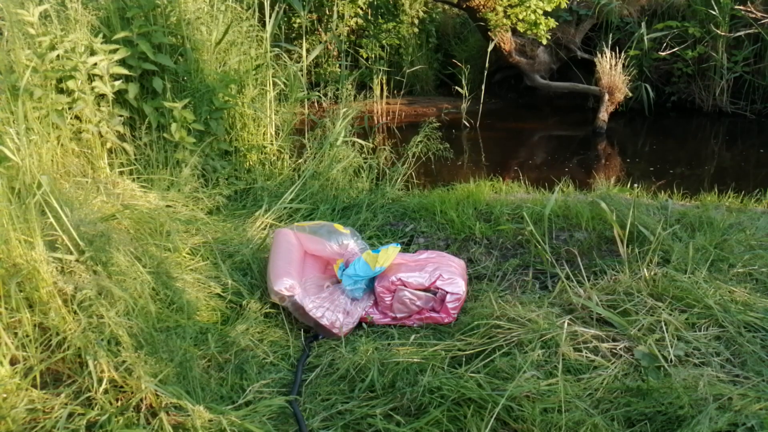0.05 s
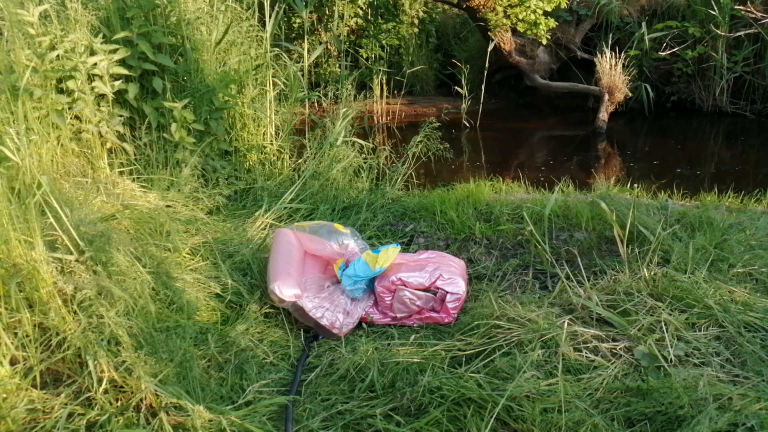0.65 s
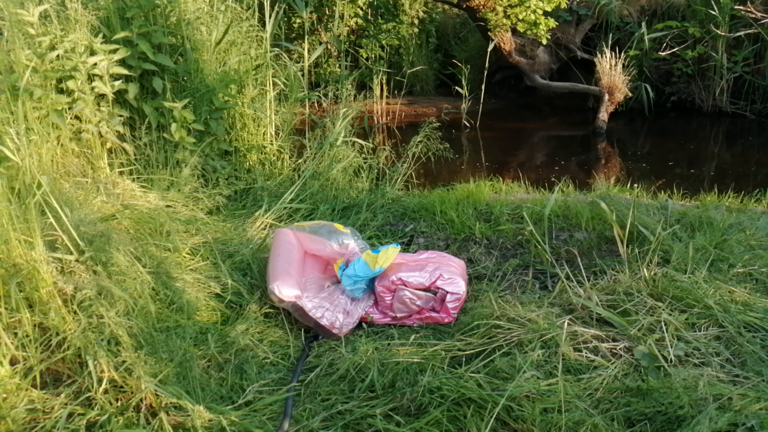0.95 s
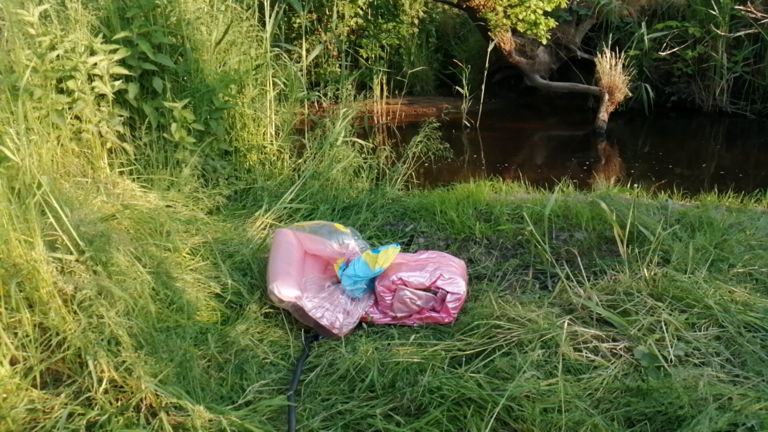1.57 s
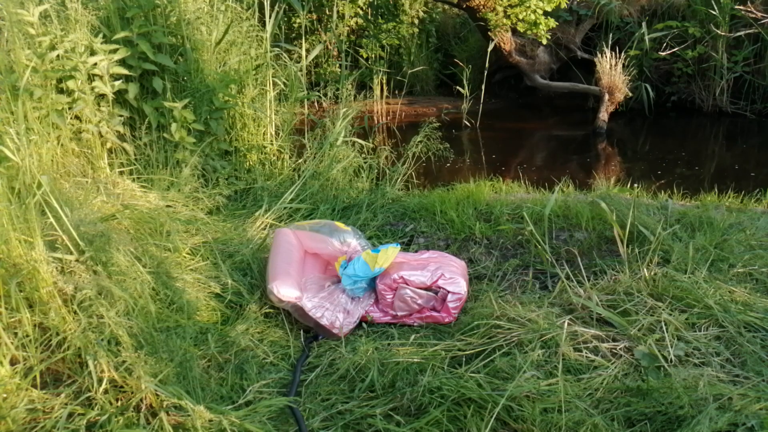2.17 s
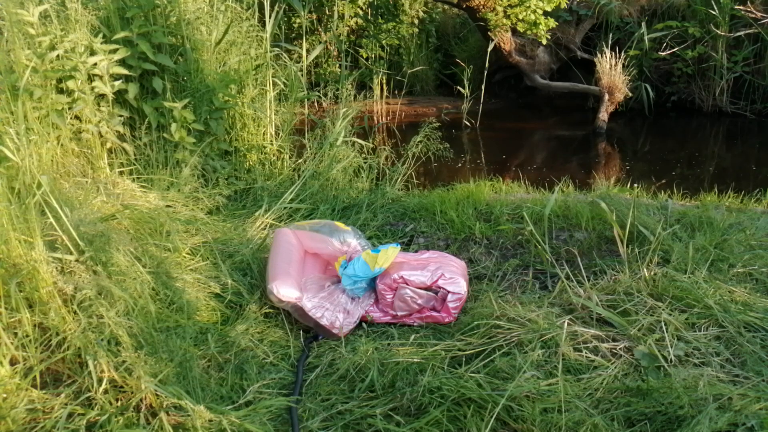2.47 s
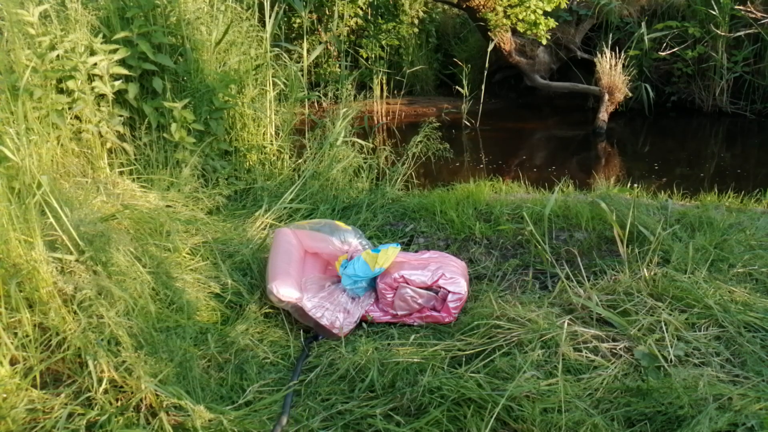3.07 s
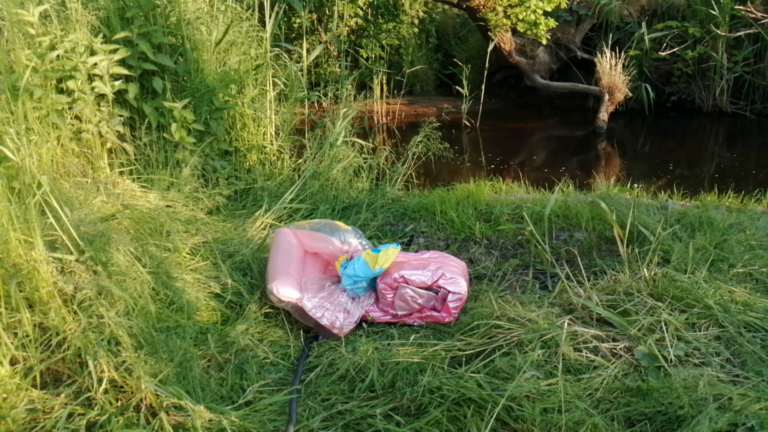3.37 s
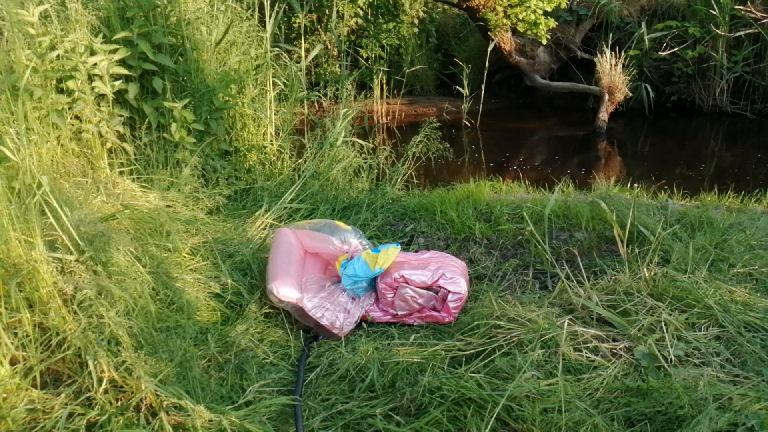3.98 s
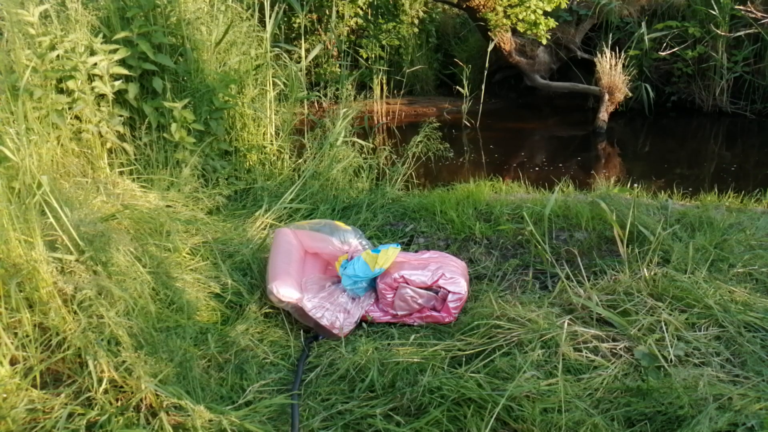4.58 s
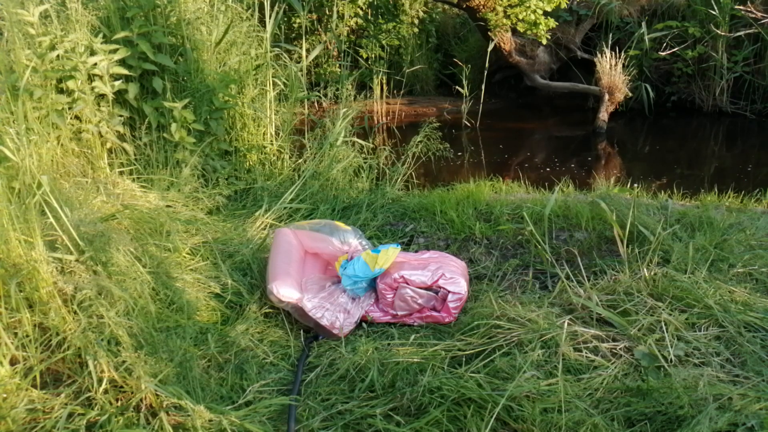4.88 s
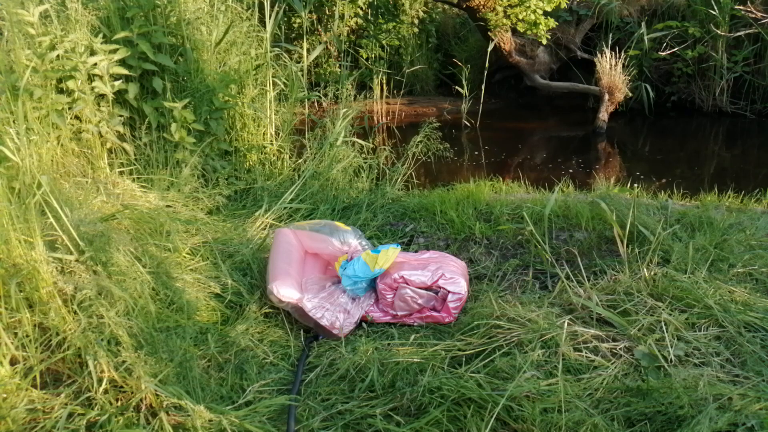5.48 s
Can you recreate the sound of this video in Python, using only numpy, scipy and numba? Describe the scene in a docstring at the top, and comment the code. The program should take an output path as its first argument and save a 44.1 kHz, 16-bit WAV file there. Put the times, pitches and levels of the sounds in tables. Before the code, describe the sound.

A hand pump inflates a plastic toy outdoors in swelling strokes of hissing air, with hollow knocks, small ticks and two short creaks.

```python
"""Hand pump on the grass

A double-action hand pump fills a plastic toy by a slow stream, close by and a little to the left.
Each stroke is one swell of air: a rush through the valves that peaks early, and a nozzle hiss that
follows the pressure. The piston judders twice as it starts down and knocks at the bottom, while shaft
and hose tick and bump. After the last knock only a brief hum and faint outdoor noise are left."""
import sys
import numpy as np
from scipy import signal
from scipy.fft import rfft, irfft
from scipy.io import wavfile
from scipy.ndimage import uniform_filter1d, map_coordinates
from numba import njit

SR = 44100
rng = np.random.default_rng(int(sys.argv[2]) if len(sys.argv) > 2 else 0)


def generate_wav(signal):
    """Clip the signal to [-1, 1] and save it as 16-bit WAV at the path in sys.argv[1]."""
    frames = np.transpose(np.atleast_2d(signal))
    scaled = np.clip(frames, -1, 1) * 32767
    pcm = np.round(scaled).astype(np.int16)
    wavfile.write(sys.argv[1], SR, pcm)


N = 253134
T = np.arange(N) / SR
FREQS = np.fft.rfftfreq(N, 1 / SR) + 1e-3

# Levels in the tables are relative; t60 is the time a sound takes to fade by 60 dB.
# tone of the background rumble and hiss, with the microphone's peaks near 7 and 15 kHz: f/Hz, level/dB
BACKGROUND_TONE = [(20, 4), (60, 13.5), (80, 7.5), (110, -2.5), (350, -7.5), (560, -7), (950, -5.5),
                   (1600, -10.5), (3300, -7.5), (3800, -15), (5200, -4), (7350, 2.5), (8300, -5),
                   (11000, -6.5), (13500, -6.5), (14900, 2.5), (15700, -4.5)]
# how much the background differs between left and right: f/Hz, level/dB
BACKGROUND_WIDTH = [(60, -9), (400, -3), (1500, -1.0), (5000, -0.5)]
# tone of the rustling grass: f/Hz, level/dB
RUSTLE_TONE = [(100, -18.5), (200, -3.5), (350, -1), (600, -16), (950, -11), (2000, -22), (5000, -14.5),
               (9000, -42.5)]
# clearest ticks of shaft and hose: t/s, level/dB, hardness (0 to 1)
TICK_EVENTS = [(0.017, -35, 0.47), (.07, -35.5, 0.3), (0.086, -35, 0.71), (0.143, -36, 0.3),
               (0.215, -39.5, 0), (0.253, -36, 0.74), (0.4, -40, 0.6), (0.416, -41.5, 0), (.806, -44, 1),
               (.97, -39.5, 0.91), (1.141, -39, 0.7), (1.696, -39, 0.93), (1.827, -29.5, 0.82),
               (1.875, -36.5, 0.8), (2.011, -33, 0.77), (2.149, -28, 0.72), (2.427, -31.5, 0.54),
               (2.763, -33.5, 1), (2.981, -34, 0.9), (3.913, -39, .45), (3.995, -48.5, 0.64)]
# resonances of a tick: f/Hz, width/Hz, level/dB
TICK_RESONANCES = [(390, 53, -3.5), (700, 110, -3), (1090, 140, -5), (1356, 1200, -13.5)]
# ringing of a tick's bump, the pump body, its base and its barrel: f/Hz, level/dB, t60/s, signed gain
BUMP_RING = [(156.6, 1.6, 0.052, 0.35), (244, 3.7, 0.032, -0.43)]
BODY_RING = [(100, -16.5, .056, 0.47), (263, -18, 0.036, 1), (356.4, 2, .019, 0.93),
             (378, 2.5, 0.021, -0.89), (437, -13, 0.042, 0.67), (657, -23, 0.049, -0.89),
             (877, -20.5, 0.077, 0.69), (1040, -20.5, 0.017, -0.84), (1252, -19.5, .04, -0.91),
             (1527, -8.5, 0.014, 0.45), (2020, -20, 0.032, -1.6), (3200, -32, 0.021, 0.69),
             (3490, -36.5, .025, 0.53), (4740, -32, 0.034, 0.3)]
BASE_RING = [(138, 0, 0.1, 0.11), (264, 0.5, 0.037, 0.91), (420, -6, 0.074, -0.21),
             (646, -17.5, 0.052, -1.16)]
BARREL_OVERTONES = [(564, -9.5, .11, 1), (962, -13, 0.095, -1.08), (1355, -15, 0.034, 1),
                    (1700, -32, 0.14, -1.4)]
# piston judders, one table each: t/s, slip rate/Hz, level/dB
JUDDER_CURVES = [
    [(1.3946, 39, -8.5), (1.412, 109.6, 1.5), (1.437, 106, 6), (1.446, 133, 0.5), (1.455, 200, 0.5)],
    [(3.2246, 47.5, -10.5), (3.248, 81.7, -1), (3.278, 113.6, 1.5), (3.314, 112, 6.5), (3.331, 69, -0.5),
     (3.347, 103, -1.5)],
]
# piston hits the bottom: t/s, level/dB, boost of the first overtone/dB, t60 of the barrel's lowest note/s
KNOCK_EVENTS = [(0.3423, -23, 5.5, 0.22), (2.393, -21, 5.5, 0.13), (4.0501, -21, -10.5, 0.29)]
# strokes, down and up in turn: start/s, end/s, rush level/dB, nozzle level/dB,
# nozzle swell from ends to middle/dB, flap whistle over the rush at the start/dB
PUMP_STROKES = [(-.6, 0.36, -47.5, -46.5, 20.5, 19), (0.408, 1.43, -50, -47, 16, 5.5),
                (1.477, 2.41, -41, -37.5, 25.5, -6), (2.464, 3.217, -44.5, -37.5, 21.5, 6),
                (3.6, 3.965, -53.5, -51.5, 4.5, -15)]
# resonances of the air path going up and going down: f/Hz, width/Hz, level/dB
PULL_RESONANCES = [(384, 110, 0), (680, 76, -18.5), (1136, 76, -1), (1530, 170, 0), (1854, 120, 1),
                   (2170, 120, -5), (2510, 100, 2), (2917, 220, 1), (3270, 180, 0.5), (3594, 110, 3.5),
                   (4820, 710, 0)]
PUSH_RESONANCES = [(371, 110, -2.5), (933, 93, -0.5), (1310, 360, -2), (1726, 170, 2), (2064, 82, 4),
                   (3156, 100, 4), (3490, 120, -0.5), (4040, 59, 1), (4776, 350, 1), (5093, 200, 3.5)]
# tone of the swirling air in the pump: f/Hz, level/dB
RUSH_TONE = [(80, -35.5), (250, -20.5), (600, -12.5), (1500, -12), (2600, -4), (3800, -12), (5000, -4.5),
             (8000, -30)]
# tone of the nozzle hiss, with the microphone's peaks near 7 and 15 kHz: f/Hz, level/dB
HISS_TONE = [(1000, -31), (3800, -11), (4900, -5), (5600, -4.5), (6600, 3), (7350, 2.5), (8200, -6.5),
             (9500, -7.5), (11000, -8.5), (13500, -6), (14800, 0), (15700, -5.5)]
# the pump at the two microphones: f/Hz, left minus right/dB, left lead/rad, direct share (0 to 1)
STEREO_IMAGE = [(100, 3.5, 0.5, 1), (380, 3, 0.29, 1), (750, 2, 0.86, 1), (1300, -1, 1, 0.89),
                (1850, 1.5, 2.7, 0.41), (3280, 3.5, 3.88, 0.48), (5230, -4.5, 4.97, 0.73),
                (6000, -3, 7.56, 0.16), (7900, 9, 8.6, 0.29), (10800, 2.5, 8, .4), (15000, -2, 18, .3)]


def undb(db):
    """Turn decibels into a gain."""
    return 10 ** (np.asarray(db) / 20)


def unit(x):
    """Scale to an average (rms) level of 1."""
    return x / np.sqrt(np.mean(x ** 2))


def noise(rows=1):
    """White noise. Three rows stand for direct, scattered left and scattered right sound."""
    return rng.standard_normal((rows, N))


def shape(x, response):
    """Filter a sound with one gain for each frequency."""
    return irfft(rfft(x) * response, N)


def curve(table, column=1):
    """Join the points of a table into a curve over all frequencies."""
    table = np.array(table)
    return np.interp(np.log(FREQS), np.log(table[:, 0]), table[:, column])


def band(hz, width_hz):
    """One resonance, with gain 1 at its centre."""
    return 1 / (1 + 1j * (FREQS / hz - hz / FREQS) * hz / width_hz)


def wander(rate_hz):
    """A smooth random wobble, about 1 in size."""
    hold = int(SR / rate_hz)
    steps = np.repeat(rng.standard_normal(N // hold + 1), hold)
    return 1.3 * uniform_filter1d(uniform_filter1d(steps, hold), hold)[:N]


def fade(t60):
    """A fade from 1 towards 0, half a second long."""
    return np.exp(-np.log(1000) * T[:SR // 2] / t60)


def ring(modes):
    """Fading tones after one blow."""
    t = T[:SR // 2]
    return -sum(gain * undb(db) * fade(t60) * np.sin(2 * np.pi * hz * t) for hz, db, t60, gain in modes)


def add(out, start_s, sound):
    """Mix a sound in at the given time."""
    i = max(int(start_s * SR), 0)
    out[i:i + len(sound)] += sound[:N - i]


def cut_bass(x, hz):
    """A small body cannot give off deep bass."""
    ratio = hz / (1j * FREQS)
    return shape(x, 1 / (1 + 0.92 * ratio + ratio ** 2))


def outdoors(level_db=-57):
    """Faint background: a low rumble shared by both sides and a thin, wide hiss."""
    tone = undb(curve(BACKGROUND_TONE))
    mid = shape(noise(), tone)
    side = shape(noise(), tone * undb(curve(BACKGROUND_WIDTH)))
    stereo = np.vstack([mid + side, mid - side]) / np.std(mid)
    return stereo * undb(level_db + 0.44 * wander(6.1))


def hum():
    """A faint low hum wavers for about a second after the last knock."""
    swell = np.interp(T, [4.05, 4.3, 5.2, 5.45], [0, 1, 1, 0])
    pitch_hz = 68 + 1.62 * wander(6.05)
    return undb(-67) * swell * np.sin(2 * np.pi * np.cumsum(pitch_hz) / SR)


def rustle(taps_per_s=45):
    """Grass and plastic settle in faint, scattered taps."""
    taps = (rng.random(N) < taps_per_s / SR) * rng.random(N) ** 2
    bursts = noise()[0] * signal.fftconvolve(taps, fade(0.04))[:N]
    return undb(-70.5) * unit(shape(bursts, undb(curve(RUSTLE_TONE))))


def crinkles(per_s=12):
    """Extra rows for the tick table: random small ticks, as strong as the air that moves the hose."""
    flow = rush_level(PUMP_STROKES)
    moments = np.flatnonzero((rng.random(N) < per_s / SR) & (flow > 0))
    return [(T[i], 20 * np.log10(flow[i]) + 0.5 - 0.5 * rng.standard_normal(), rng.random())
            for i in moments]


def ticks():
    """Shaft and hose make short plastic scuffs, each with a low bump and a crisp click."""
    scuffs, clicks, bumps = np.zeros((3, N))
    bump = ring(BUMP_RING)
    for start, db, hardness in TICK_EVENTS + crinkles():
        # a soft contact has more bump and less click, and lasts longer
        bump_db = np.interp(hardness, [0, 1], [11, -9.5])
        click_db = np.interp(hardness, [0, 1], [-8, 20])
        t60 = 0.0301 * undb(0.15 * bump_db)
        swell = 1 - fade(0.79 * t60)
        add(scuffs, start, undb(db + 6.5) * fade(t60) * swell)
        add(clicks, start, undb(db + click_db) * fade(0.012) * swell)
        add(bumps, start, undb(db + bump_db) * bump * swell)
    clack = band(630, 1400) * sum(undb(db) * band(hz, width) for hz, width, db in TICK_RESONANCES)
    out = scuffs * unit(shape(noise(3), clack))
    out += clicks * unit(shape(noise(3), band(2900, 5000) ** 2))
    out[0] += bumps
    return cut_bass(out, hz=106)


def judder(full_slip_s=0.00043):
    """The seal sticks and slips, faster as the push builds; each slip rings the body and scrapes."""
    slips = np.zeros(N)
    for rows in JUDDER_CURVES:
        times, rate_hz, db = np.transpose(rows)
        t = np.arange(times[0], times[-1], 1 / SR)
        slip_count = np.floor(np.cumsum(np.interp(t, times, rate_hz)) / SR)
        for when in t[np.diff(slip_count, prepend=-1) > 0]:
            size = undb(np.interp(when, times, db))
            push = fade(full_slip_s / size ** 0.7)  # weaker slips last longer
            add(slips, when + 5e-5 * rng.standard_normal(), size * push / push.sum())
    rasp = band(1400, 850) * band(2000, 7000)
    rasp += undb(-2) * band(2320, 1200) ** 3 + undb(-12) * band(5150, 1100) ** 3
    # the scrape grows faster than the slips that drive it
    scrape = abs(signal.fftconvolve(slips, fade(0.058))[:N]) ** 1.1
    out = undb(-34) * unit(shape(noise(3), rasp)) * scrape
    out[0] += signal.fftconvolve(slips, ring(BODY_RING))[:N]
    return cut_bass(out, hz=145)


def knocks(barrel_hz=193.6):
    """The piston hits the bottom: a thud, then the air in the barrel swells and rings on."""
    t = T[:SR // 2]
    # the air column shortens as the seal gives, so its overtones start a little flat
    bent_time = t - 0.0011 * (1 - fade(0.053))
    out = np.zeros(N)
    for start, db, boost_db, t60 in KNOCK_EVENTS:
        thud = (ring(BASE_RING) + ring([(barrel_hz, -12, t60, 1)])) * (1 - fade(0.0099))
        overtones = undb(boost_db) * ring(BARREL_OVERTONES[:1]) + ring(BARREL_OVERTONES[1:])
        column = np.interp(bent_time, t, overtones) * (1 - fade(0.088))
        add(out, start, undb(db) * (undb(2.5) * thud + undb(6.5) * column))
    cushioned = shape(out, 1 / (1 + 1j * FREQS / 2400) ** 2)  # the rubber seal softens the blow
    return cut_bass(cushioned, hz=96)


def travel(start, end):
    """How far the piston has gone: 0 at the start of a stroke, 1 at its end."""
    return (T - start) / (end - start)


def rush_level(strokes, rise=0.79, fall=1.316):
    """The rush of air swells early in each stroke and ebbs as the handle slows."""
    peak = rise / (rise + fall)
    level = np.zeros(N)
    for start, end, db, *_ in strokes:
        done = np.clip(travel(start, end), 0, 1)
        level += undb(db) * (done / peak) ** rise * ((1 - done) / (1 - peak)) ** fall
    return level


def seal_rub(grains_per_s=260):
    """The seal rubs along the barrel in uneven grains."""
    grains = noise() * (rng.random(N) < grains_per_s / SR)
    tone = band(290, 220) * band(270, 1200) + undb(-2.5) * band(1200, 730) ** 2
    return unit(shape(grains, tone))


def flap_whistle(hz=2134, fade_db=29.5):
    """A valve flap whistles while its gap is narrow and quietens as the stroke opens it."""
    level = np.zeros(N)
    for stroke in PUMP_STROKES:
        start, end, *_, whistle_db = stroke
        done = np.clip(travel(start, end), 0, 1)
        level += rush_level([stroke]) * undb(whistle_db - fade_db * done)
    return level * unit(shape(noise(3), band(hz, 240) ** 2))


def nozzle_hiss(echo_s=0.0024, flatness=2.58):
    """The jet hisses with the hose pressure, most at mid-stroke, and echoes in the swaying hose end."""
    level = sum(undb(db - swell_db * abs(2 * travel(start, end) - 1) ** flatness)
                for start, end, _, db, swell_db, _ in PUMP_STROKES)
    hiss = shape(noise(3), undb(curve(HISS_TONE)))
    earlier = T - echo_s * (1 + 0.012 * wander(3))
    echo = np.array([map_coordinates(row, [earlier * SR], order=3) for row in hiss])
    flutter = undb(1.6 * wander(28))
    return undb(2) * level * unit(hiss + undb(-7) * echo) * flutter


def rush(resonances, flutter_db, wander_db, drift_s, groups=3):
    """Air swirls through one path in the pump; groups of its resonances come and go."""
    swirl = shape(noise(3), undb(curve(RUSH_TONE)))
    for k in range(groups):
        peaks = sum(undb(db) * abs(band(hz, width)) ** 2 for hz, width, db in resonances[k::groups])
        swirl += shape(noise(3), peaks) * undb(-1 + wander_db * wander(11))
    bent_time = T + drift_s * wander(2)  # a changing path length bends every resonance
    bent = np.array([np.interp(bent_time % T[-1], T, row) for row in swirl])
    return unit(bent) * undb(flutter_db * wander(45.3))


def blow(swirl, level, treble_hz=4030, full_treble_db=-43.5):
    """Faster air is louder and also brighter."""
    dull = shape(swirl, 1 / (1 + (FREQS / treble_hz) ** 10))
    brightness = (level / undb(full_treble_db)) ** 0.4
    return level * (dull + (swirl - dull) * brightness)


def pumped_air():
    """The valves switch the air path at each turn of the handle; the nozzle hisses both ways."""
    up = undb(4) * rush(PULL_RESONANCES, flutter_db=2.5, wander_db=1.5, drift_s=0.011)
    down = undb(3) * rush(PUSH_RESONANCES, flutter_db=2.2, wander_db=2.5, drift_s=0.006)
    rub = seal_rub()  # louder under the load of a push
    pulls = blow(up + undb(-18) * rub, rush_level(PUMP_STROKES[1::2]))
    pushes = blow(down + undb(-11.5) * rub, rush_level(PUMP_STROKES[::2]))
    return pulls + pushes + flap_whistle() + nozzle_hiss()


def to_stereo(direct, scattered):
    """Sound reaches the left microphone first; part of it arrives scattered by the grass."""
    balance_db, lead, direct_share = (curve(STEREO_IMAGE, column) for column in (1, 2, 3))
    direct_share = np.clip(direct_share, 0, 1)
    arrival = np.array([np.ones_like(lead), np.exp(-1j * lead)])
    gain = undb(np.array([balance_db, -balance_db]) / 2)
    straight = shape(direct, gain * arrival * np.sqrt(direct_share))
    return straight + shape(scattered, gain * np.sqrt(1 - direct_share))


def scene():
    """The pump in the open air."""
    pump = pumped_air() + judder() + ticks()
    further_left = undb([[0.75], [-0.75]])  # the base stands further left than the handle
    base = to_stereo(knocks(), np.zeros((2, N))) * further_left
    return to_stereo(pump[0] + rustle(), pump[1:]) + base + hum() + outdoors()


@njit
def follow_level(x, attack_s, release_s):
    """Track a level, with one speed for rising and another for sinking."""
    attack, release = 1 / (attack_s * SR), 1 / (release_s * SR)
    out, level = np.empty(len(x)), 0.
    for i in range(len(x)):
        level += (x[i] - level) * (attack if x[i] > level else release)
        out[i] = level
    return out


def record(dry, limit_db=-19, ratio=1.73, top_hz=15750):
    """The recorder turns down the loudest moments and cuts off the highest treble."""
    level = follow_level(abs(dry).max(axis=0), attack_s=0.002, release_s=0.079)
    gain = np.maximum(level / undb(limit_db), 1) ** (1 / ratio - 1)
    treble_cut = signal.ellip(12, 0.2, 80, top_hz, fs=SR, output="sos")
    return signal.sosfilt(treble_cut, dry * gain)


dry = scene()
out = record(dry)
generate_wav(out)
```